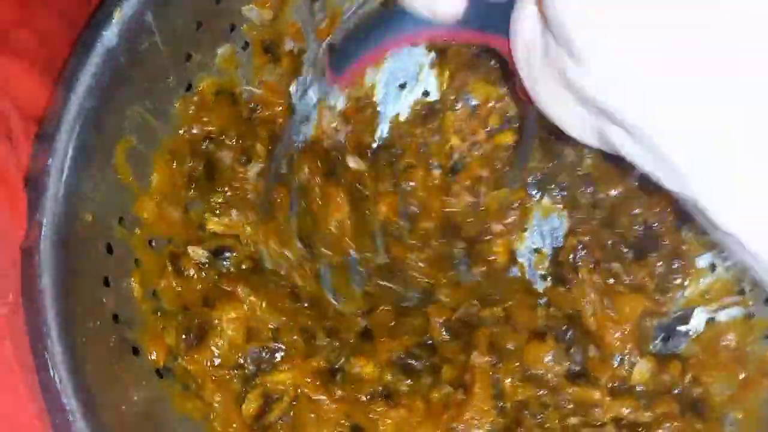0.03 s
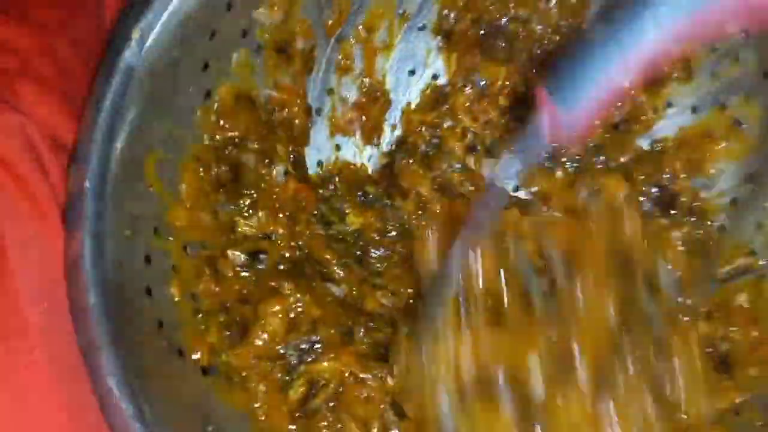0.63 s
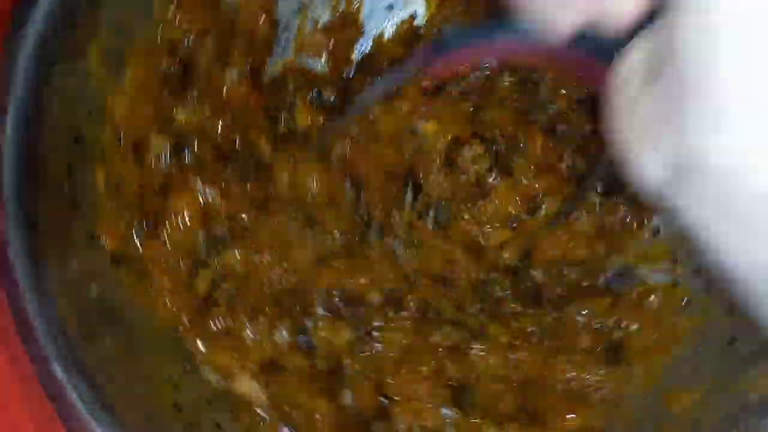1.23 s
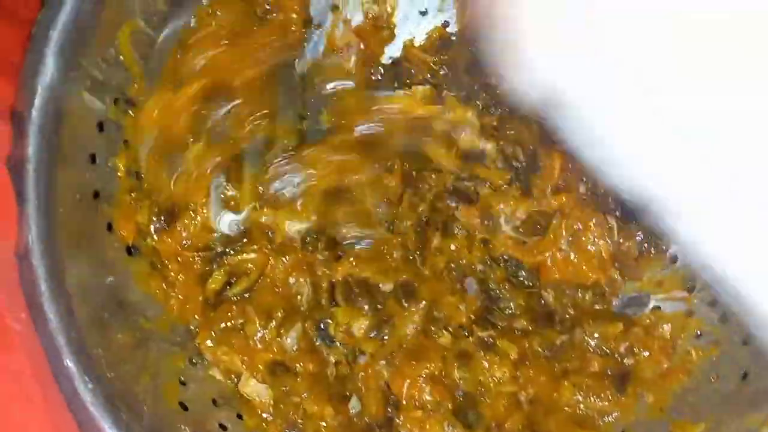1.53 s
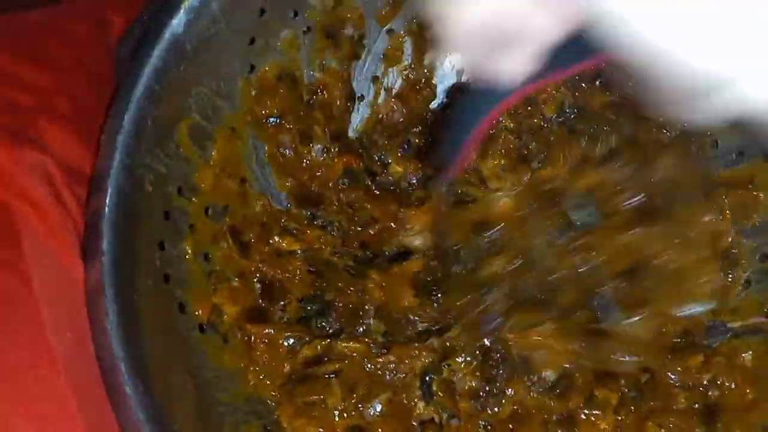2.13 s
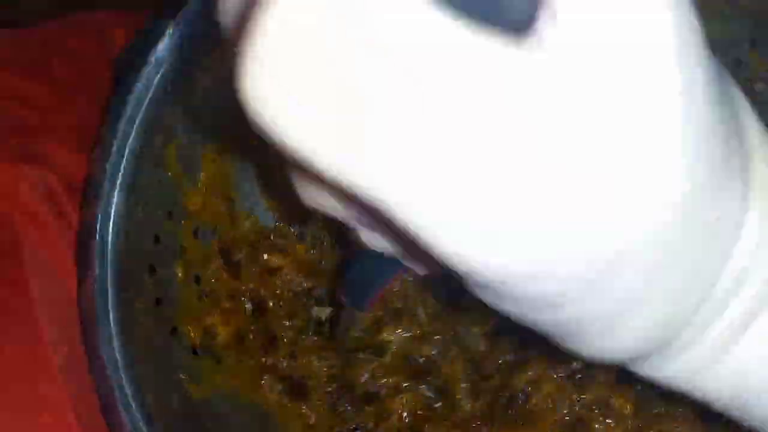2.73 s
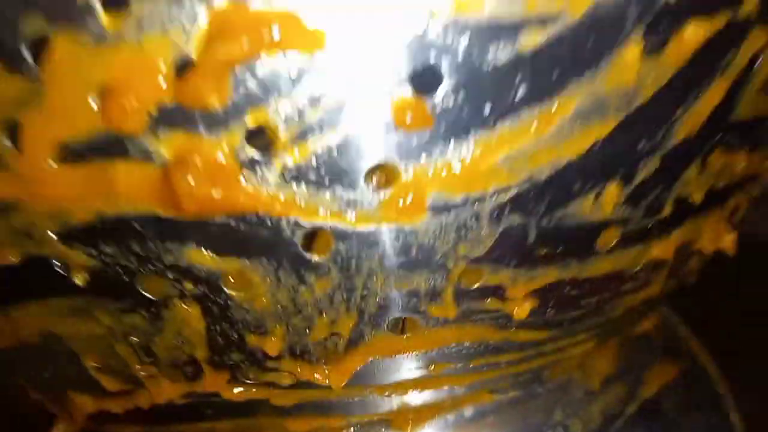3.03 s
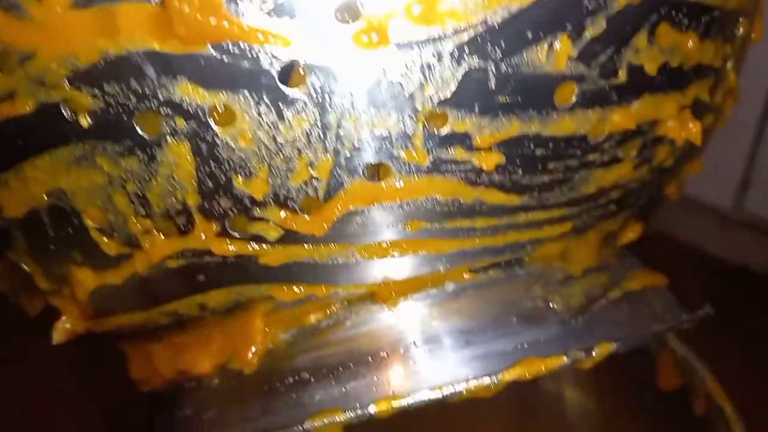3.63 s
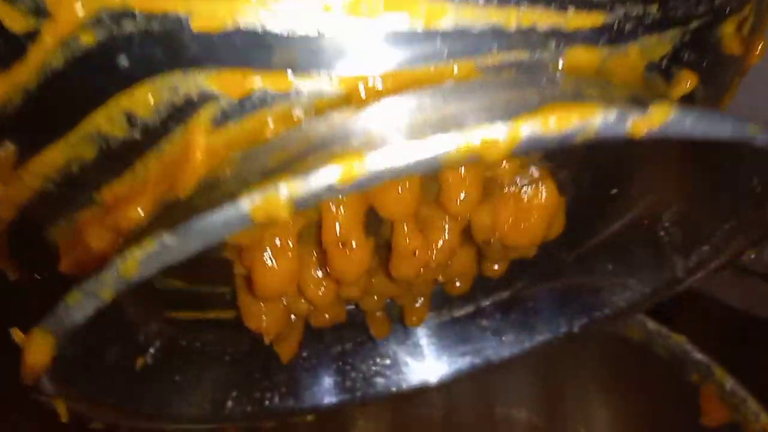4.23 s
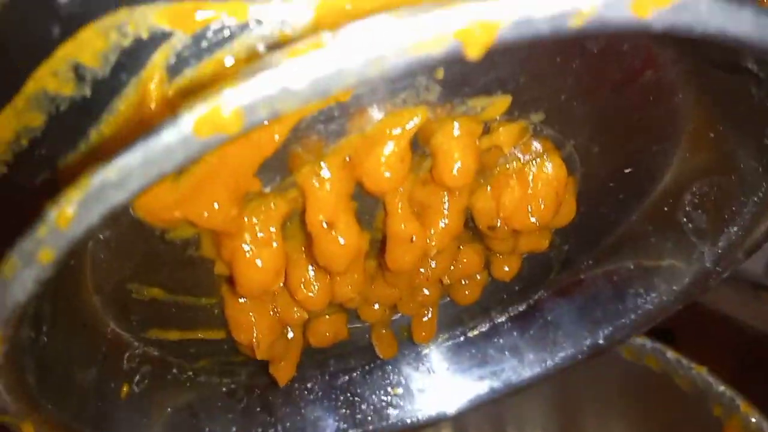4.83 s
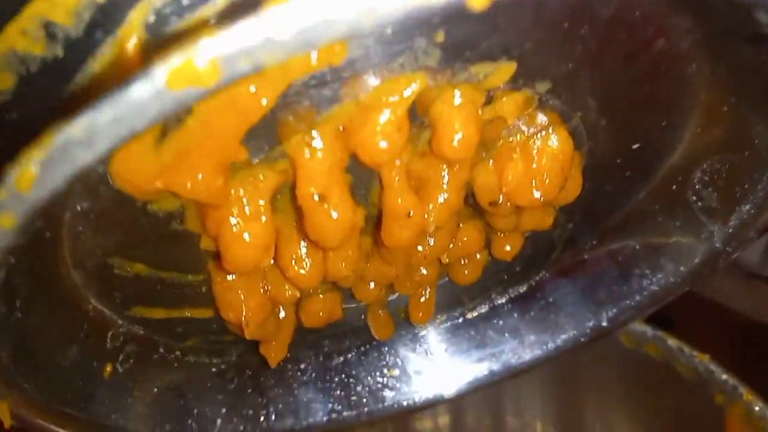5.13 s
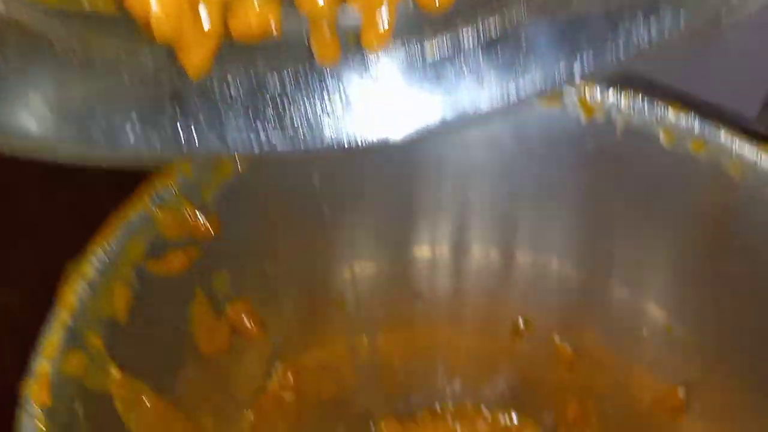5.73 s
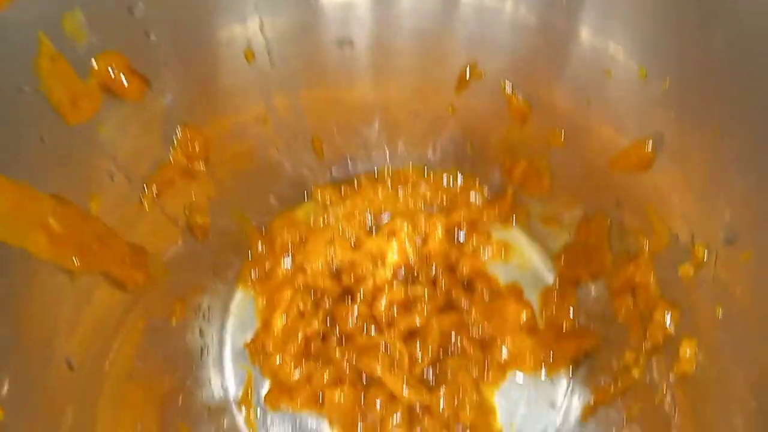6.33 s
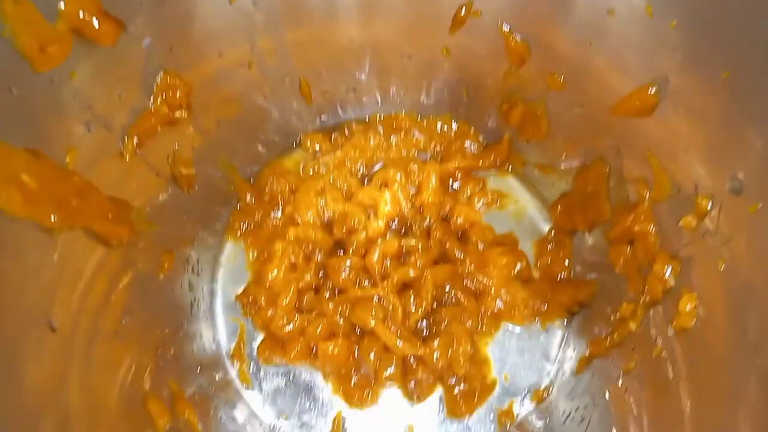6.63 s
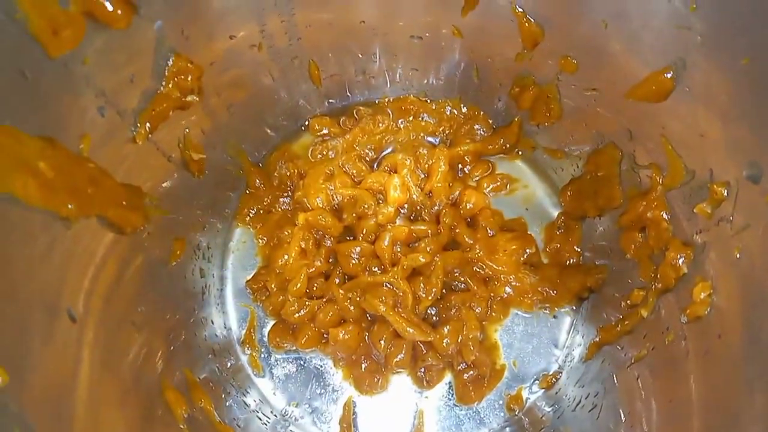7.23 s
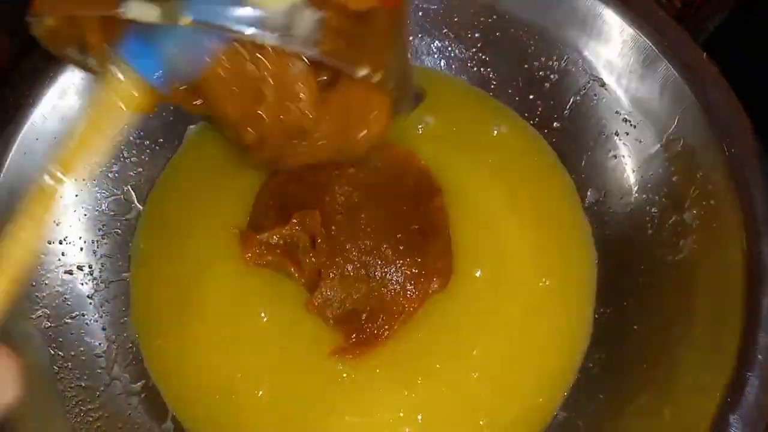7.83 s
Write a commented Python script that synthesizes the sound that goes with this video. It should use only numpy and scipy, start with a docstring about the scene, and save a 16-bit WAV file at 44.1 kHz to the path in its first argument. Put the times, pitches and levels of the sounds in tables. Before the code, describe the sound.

In a quiet kitchen, soft pulp squishes and crackles up close as a utensil drags across a metal colander and now and then knocks it, hardest near the end of the mashing. A dull little click leads into a longer stretch of low rumble and appliance hum. Far off, a clock ticks faintly about once a second and a bird chirps twice. Then everything cuts off.

```python
"""Mashing fruit through a colander

A quiet kitchen, a two-port microphone close to a steel colander. Each push of a hand masher drags over
the perforated metal and squeezes air out of the wet pulp in fizz and pops; now and then it knocks the
colander. Two faint splice clicks lead to the quiet room: an appliance's hum, a far clock, a distant bird.
At 7.3 s everything cuts to silence."""
import sys
import numpy as np
from scipy import signal
from scipy.fft import rfft, irfft
from scipy.io import wavfile

SR = 44100
rng = np.random.default_rng(int(sys.argv[2]) if len(sys.argv) > 2 else 0)


def inscribe(sig):
    """Save sig as 16-bit PCM at rate SR to the path in sys.argv[1].

    A 1-D sig is mono; a 2-D sig holds one channel per row.
    Samples are clipped to [-1, 1] before scaling.
    """
    pcm = np.round(np.clip(np.atleast_2d(sig).T, -1, 1) * 32767)
    wavfile.write(sys.argv[1], SR, pcm.astype(np.int16))


N = 351918
TIME = np.arange(N) / SR
KITCHEN_T60_S, SILENCE_AT_S = 0.34, 7.3

# Low rumble of the kitchen: frequency_hz, density_db_per_hz
RUMBLE_SPECTRUM = [(20, -112), (40, -96.5), (60, -79), (85, -74.5), (120, -76), (170, -86), (230, -78),
                   (290, -77.5), (350, -86.5), (430, -100), (700, -109), (1200, -121), (4000, -140)]
# The appliance as the microphone moves about: time_s, rumble_gain_db, hum_db
APPLIANCE_LEVELS = [(0, 0, -44.5), (1.5, -0.5, -43.5), (2.7, 2, -46.5), (2.85, -4, -47), (5.8, -2.5, -46.5),
                    (6.2, -0.5, -44.5), (7.3, 0, -45)]
# A clock across the room: start_s, relative_db
CLOCK_TICKS = [(3.331, -60), (4.34, -62.5), (5.34, -63), (6.34, -61)]
# A distant bird: start_s, length_s, start_hz, end_hz, level_db
BIRD_CHIRPS = [(4.539, 0.062, 4020, 3300, -71.5), (4.767, .11, 5180, 3650, -65.5)]
# Two faint, dull clicks at a splice, where the sound cuts to the quiet kitchen: start_s, level_db
SPLICE_CLICKS = [(2.772, -40.5), (2.783, -39)]
# Modes of the colander, damped by pulp: pitch_hz, level_db, t60_s (capped in colander_ring)
COLANDER_MODES = [(282, -8, 0.12), (460, -7, 0.099), (626, -3, 0.072), (715, -2.5, 0.058),
                  (792, -12, 0.043), (1155, -14, 0.2), (1560, -19.5, 0.14), (1750, -2, 0.081),
                  (2000, -20, 0.25), (2560, -9.5, 0.18), (2670, -18, 0.28), (2890, -18.5, 0.2),
                  (4180, -12.5, 0.083), (3960, -29.5, 0.15), (4340, -13.5, 0.13), (4200, -26.5, 0.67),
                  (5010, -13.5, 0.17), (5600, -19, 0.13), (5500, -22, 0.21), (5600, -21.5, 0.15),
                  (6170, -15.5, 0.11), (6260, -28, 0.21), (7000, -26, 0.16), (7800, -24, 0.18),
                  (8260, -18.5, 0.062)]
# The colander's crowd of weaker modes: frequency_hz, level_db
SHIMMER_SPECTRUM = [(150, -0.5), (300, 5.5), (720, 5), (980, -6), (1800, 2), (3500, 0.5), (6000, -6.5),
                    (9000, -10), (12000, 0), (16000, 3)]
# Masher meets colander: start_s, ring_db, brightness_hz, thump_db, thump_hz, tick_db
MASHER_KNOCKS = [(-0.012, -34, 1400, -28, 74, -40), (0.758, -39, 1103, -33, 75, -45),
                 (0.863, -41.5, 646, -33, 95, -49), (1.578, -28.5, 1377, -33, 79, -17),
                 (1.834, -32.5, 546, -31.5, 324, -67), (2.4375, -22.5, 10000, -11.5, 78.5, -10),
                 (2.5201, -29.5, 497, -24, 251, -43), (2.524, -39, 450, -35.5, 85.6, -30)]
# Pushes of the masher, with the levels they swell to: start_s, length_s, squelch_db, drag_db
MASHER_PUSHES = [(-.05, 0.043, -40.5, -42.5), (0.097, 0.025, -42, -72), (0.158, 0.11, -49.5, -62.5),
                 (0.303, 0.13, -40, -46), (0.458, 0.12, -44, -49), (0.728, 0.04, -39.5, -47),
                 (0.825, 0.081, -45.5, -49), (1.051, 0.091, -44.5, -54), (1.139, 0.093, -39, -47),
                 (1.549, 0.08, -43.5, -53), (1.668, 0.11, -42, -51), (1.771, 0.088, -41, -47.5),
                 (1.98, 0.13, -46.5, -63.5), (2.548, 0.096, -57.5, -92)]
# Slips of steel through pulp: pitch_hz, relative_db
SLIP_SPECTRUM = [(200, -6), (300, 5), (430, -1), (620, -0.5), (820, -3), (1080, -5.5), (1350, -0.5),
                 (1900, -6), (2450, 3), (3100, -4.5), (4000, 0.5), (5000, -8)]
# Small bubbles in the pulp: pitch_hz, relative_db
BUBBLE_SPECTRUM = [(1800, -13.5), (3200, -6.5), (4400, 1), (6500, -0.5), (9000, -5.5), (12000, 2),
                   (15000, 1.5)]
# The largest air pockets bursting, heard at the near port: start_s, relative_db, nominal_pitch_hz
AIR_POCKETS = [(0.0264, -13, 2300), (0.0525, -11.5, 5540), (.118, -13, 6500), (.125, -11, 4800),
               (0.1315, -11.5, 11900), (0.1876, -19, 13500), (0.2554, -18.5, 13400), (.398, -18, 6500),
               (.5069, -17.5, 5700), (.744, -19.5, 4700), (0.7551, -15, 5730), (.793, -16.5, 14200),
               (0.8738, -18, 6740), (.974, -8.5, 6000), (1.083, -26.5, 15000), (1.1075, -13.5, 7500),
               (1.165, -13.5, 5400), (1.2215, -12.5, 12500), (1.2254, -12, 2720), (1.2291, -7, 7500),
               (1.317, -20, 5970), (1.6945, -21.5, 7400), (1.757, -5.5, 7440), (1.8055, -14, 7400),
               (1.8513, -11.5, 7160), (1.864, -15, 2340), (2.0349, -16, 6800), (2.0668, -11.5, 3300),
               (2.0978, -20, 7526), (2.1235, -26.5, 2195), (2.1608, -24, 15600), (2.1793, -25.5, 6460),
               (2.5908, -25.5, 11600), (2.6324, -28.5, 4700), (2.6634, -24.5, 7000), (2.726, -21, 11900)]
# Resonances of the microphone's ports, left nearer the work: frequency_hz, left_db, right_db
PORT_RESPONSE = [(761, -0.5, 0), (3300, 0.5, -6), (4700, 4.5, 0.5), (5700, 5.5, 5.5), (6500, 6, -3.5),
                 (7400, 9.5, -7.5), (8697, -3, -20), (9660, -10.5, -12.5), (10840, -1.5, 0.5),
                 (12800, 3.5, 2.5), (15300, -5, -7.5)]
# Microphone hiss: frequency_hz, left_db_per_hz, right_db_per_hz
MIC_HISS = [(890, -116, -117), (2370, -118, -113), (3130, -120, -119), (4700, -119, -112),
            (5136, -120, -102), (6000, -119, -102), (6615, -109, -112), (7500, -105, -122),
            (8640, -122, -129), (9400, -128, -127), (11800, -119, -116), (15800, -123, -123)]


def amp(db):
    """Decibels to gain."""
    return 10 ** (np.asarray(db) / 20)


def unit_rms(x):
    """Scale to an rms of one."""
    return x / np.sqrt(np.mean(x ** 2) + 1e-20)


def db_at(spectrum, hz, column=1):
    """Read a spectrum on a log-frequency axis."""
    table = np.array(spectrum)
    return np.interp(np.log(np.maximum(hz, 1)), np.log(table[:, 0]), table[:, column])


def colour(x, spectrum, column=1, size=4096):
    """Causal (minimum-phase) filter with the given spectrum."""
    hz = np.linspace(0, SR / 2, size // 2 + 1)
    cepstrum = irfft(np.log(amp(db_at(spectrum, hz, column))))
    cepstrum[1:size // 2] *= 2
    cepstrum[size // 2 + 1:] = 0
    return signal.oaconvolve(x, irfft(np.exp(rfft(cepstrum))))[:len(x)]


def butter(x, hz, kind, order=2):
    """Butterworth low- or high-pass."""
    return signal.sosfilt(signal.butter(order, hz, kind, fs=SR, output="sos"), x + 1e-18)


def decay(t, t60_s):
    """Exponential fall of 60 dB in t60_s."""
    return np.exp(-np.log(1000) * t / t60_s)


def glide(pitch_hz):
    """A sine that follows a pitch curve."""
    return np.sin(2 * np.pi * np.cumsum(pitch_hz) / SR)


def drift(per_s):
    """A random wander with an rms of one."""
    knots = rng.standard_normal(4096)
    return unit_rms(np.interp(TIME * per_s, np.arange(len(knots)), knots))


def noise(spectrum, column=1):
    """Noise with a spectrum in dB per Hz."""
    return colour(rng.standard_normal(N) * np.sqrt(SR / 2), spectrum, column)


def add(out, start_s, sound):
    """Mix a sound in at a time, trimmed at both ends of the scene."""
    i = round(start_s * SR)
    part = sound[max(0, -i):N - i]
    i = max(0, i)
    out[i:i + len(part)] += part


def reflections(x, t60_s, gap_s):
    """Diffuse reflections of about unit energy, different on each side."""
    t = TIME[:SR // 2]
    tail = rng.standard_normal((2, len(t))) * decay(t, t60_s) * (t > gap_s)
    tail /= np.sqrt(np.sum(tail ** 2) / 2)
    return signal.oaconvolve(x[None], tail, axes=1)[:, :N]


def appliance(hum_hz=119.8):
    """An appliance hums at twice the mains rate over a low rumble."""
    time_s, *levels = np.transpose(APPLIANCE_LEVELS)
    rumble_db, hum_db = (np.interp(TIME, time_s, level) for level in levels)
    mid = noise(RUMBLE_SPECTRUM)
    side = amp(-9) * noise(RUMBLE_SPECTRUM) * [[1], [-1]]
    rumble = amp(rumble_db) * (mid + side)
    hum = amp(hum_db + drift(4.6)) * np.sin(2 * np.pi * hum_hz * TIME + 0.063 * drift(12))
    return rumble * amp([[-0.5], [0.5]]) + hum * amp([[-1.5], [2.3]])


def bird():
    """Each distant chirp is a falling whistle that swells and fades."""
    out = np.zeros(N)
    for start_s, length_s, start_hz, end_hz, level_db in BIRD_CHIRPS:
        progress = np.linspace(0, 1, int(length_s * SR))
        whistle = glide(start_hz + (end_hz - start_hz) * progress)
        add(out, start_s, amp(level_db) * np.sin(np.pi * progress) * whistle)
    return out


def clock(tick_hz=4100):
    """Each tick is a short burst of noise coloured by the clock's case."""
    out, t = np.zeros(N), TIME[:SR // 8]
    case = [(tick_hz / 2, -25), (tick_hz * 0.86, -7), (tick_hz, 2), (tick_hz * 1.11, -7), (15000, -10)]
    for start_s, level_db in CLOCK_TICKS:
        tick = colour(rng.standard_normal(len(t)), case) * decay(t, 0.087)
        add(out, start_s, amp(level_db + 6.5) * tick)
    return out


def splice_clicks():
    """Two faint, dull clicks at a splice: each a step in the signal that dies away quickly."""
    out = np.zeros(N)
    for start_s, level_db in SPLICE_CLICKS:
        add(out, start_s, amp(level_db) * decay(TIME[:SR // 50], 0.0097))
    return out


def colander_ring(longest_t60_s=0.32):
    """The steel rings after one touch; every touch weights the modes anew."""
    modes, t = 0, TIME[:SR * 2 // 3]
    for hz, level_db, t60_s in COLANDER_MODES:
        weight = amp(level_db + rng.normal(0, 2.6)) * rng.choice([-1, 1])
        modes += weight * np.sin(2 * np.pi * hz * t) * decay(t, min(t60_s, longest_t60_s))
    weak_modes = colour(rng.standard_normal(len(t)), SHIMMER_SPECTRUM)
    shimmer, clatter = decay(t, 0.42), amp(6) * decay(t, 0.1)
    return modes + amp(-7) * weak_modes * (shimmer + clatter)


def knocks(tick_hz=6030, overtone_hz=12400, stiffening=0.9):
    """A bare metal tick, the bowl's ring and its slower bounce on the pot; gives near and far wall."""
    near_wall, far_wall, t = np.zeros(N), np.zeros(N), TIME[:SR * 2 // 3]
    tick = np.sin(2 * np.pi * tick_hz * t) * decay(t, 0.0091)
    tick += amp(4) * np.sin(2 * np.pi * overtone_hz * t) * decay(t, 0.002)
    for start_s, ring_db, brightness_hz, thump_db, thump_hz, tick_db in MASHER_KNOCKS:
        swell = t * thump_hz / 1.45   # reaches one at the thump's peak
        bounce_hz = thump_hz * (1 + stiffening * np.exp(-2 * swell))   # quicker while contact is tight
        thump = glide(bounce_hz) * (swell * np.exp(1 - swell)) ** 3
        near_ring, far_ring = (butter(colander_ring(), brightness_hz, "low", order=4) for _ in range(2))
        add(near_wall, start_s, amp(ring_db) * near_ring + amp(thump_db) * thump + amp(tick_db) * tick)
        add(far_wall, start_s, amp(ring_db - 8.5) * far_ring)
    return near_wall, far_wall


def push_levels(attack_s=0.045, squelch_db_per_s=34, drag_db_per_s=53):
    """Squelch and drag in dB: the masher sinks in, pressure builds, then it lets go."""
    wet = metal = amp(-110)
    for start_s, length_s, squelch_db, drag_db in MASHER_PUSHES:
        contact = np.sin(np.pi / 2 * np.clip((TIME - start_s) / attack_s, 0, 1)) ** 2
        left_s = np.maximum(start_s + length_s - TIME, 0)
        since_s = np.maximum(TIME - start_s - length_s, 0)
        settling = amp(-13.5) * decay(since_s, 0.98)   # the pulp crackles on after the push
        release = np.hypot(decay(since_s, 0.21), settling)
        wet = np.hypot(wet, contact * amp(squelch_db - squelch_db_per_s * left_s) * release)
        metal = np.hypot(metal, contact * amp(drag_db - drag_db_per_s * left_s) * decay(since_s, 0.19))
    return 20 * np.log10(wet), 20 * np.log10(metal)


def cavities(spectrum, per_s, spread_db, cycles, patchy_db, shifts_per_s, pitches=24):
    """Random clicks ring small cavities briefly; as the pulp deforms, other pitches take the lead."""
    sizes = amp(spread_db * np.minimum(rng.exponential(1, N), 4)) * rng.choice([-1, 1], N)
    clicks = sizes * (rng.random(N) < per_s / SR)
    cavity_hit = rng.integers(0, pitches, N)
    out = np.zeros(N)
    for k, hz in enumerate(np.geomspace(spectrum[0][0], spectrum[-1][0], pitches)):
        strikes = clicks * (cavity_hit == k) * amp(db_at(spectrum, hz) + patchy_db * drift(shifts_per_s))
        radius, angle = decay(1 / SR, cycles / hz), 2 * np.pi * hz / SR
        resonator = [np.sin(angle), -np.sin(angle)], [1, -2 * radius * np.cos(angle), radius ** 2]
        out += signal.lfilter(*resonator, strikes + 1e-18) / np.sqrt(angle)
    return unit_rms(out)


def drag(level_db):
    """The masher slips over holes and seeds, ringing hollows in the pulp and the colander's modes."""
    slips = cavities(SLIP_SPECTRUM, per_s=6000, spread_db=2, cycles=24, patchy_db=4.5, shifts_per_s=25)
    slips *= amp(level_db)
    ring = colander_ring()
    steel = signal.oaconvolve(slips, ring / np.linalg.norm(ring))[:N]
    return amp(7) * slips + amp(-14) * steel


def pops(t60_s=0.0033, rise=0.37, snap_db=-11):
    """A film tears with a snap; the opening air pocket rings and sweeps up in pitch."""
    out, t = np.zeros(N), TIME[:SR // 30]
    envelope = decay(t, t60_s) * (1 - np.exp(-t / 0.000053))
    for start_s, level_db, hz in AIR_POCKETS:
        pitch_hz = hz * (1 + rise * (0.42 - np.exp(-6 * t / t60_s)))
        tone = glide(pitch_hz) * amp(3 - db_at(PORT_RESPONSE, hz))   # offsets the near port's resonance
        snap = amp(snap_db) * butter(rng.standard_normal(len(t)), hz / 2, "high")
        add(out, start_s, amp(level_db) * (tone + snap) * envelope)
    return butter(out, 2400, "high", order=1)


def squelch(level_db, stickiness=0.55):
    """Hard pressure gives a dense fizz; as it eases, the pulp peels off in separate sticky clicks."""
    slack_db = stickiness * np.clip(-43.5 - level_db, -8, 10)
    fizz = cavities(BUBBLE_SPECTRUM, per_s=10000, spread_db=2.5, cycles=17, patchy_db=4, shifts_per_s=45)
    crackle = cavities(BUBBLE_SPECTRUM, per_s=150, spread_db=3, cycles=13, patchy_db=5, shifts_per_s=96)
    return amp(level_db + 1.5 - slack_db / 2) * fizz + amp(level_db - 1.5 + slack_db) * crackle


def close_left(x, shadow_db=-11, lag_s=0.00053, split_hz=800):
    """The bass reaches both ports alike; the treble reaches the right one later and shaded."""
    bass, treble = (butter(butter(x, split_hz, kind), split_hz, kind) for kind in ("low", "high"))
    shaded = amp(shadow_db) * np.interp(TIME - lag_s, TIME, treble)
    return np.array([bass + treble, bass + shaded])


def scene():
    """Pulp and metal close to the microphone, reflected in the bowl, with the kitchen behind."""
    squelch_db, drag_db = push_levels()
    near_wall, far_wall = knocks()
    foreground = squelch(squelch_db) + drag(drag_db) + pops() + near_wall + splice_clicks()
    # the far wall of the bowl and the pulp on it face the right port
    far_pulp = amp(-8) * (squelch(squelch_db) + drag(drag_db))
    far_side = butter(far_pulp + far_wall, 650, "high") * [[0], [1]]
    above_bass = butter(foreground, 280, "high")
    bowl = amp([[-8.5], [-10.5]]) * reflections(above_bass, t60_s=0.0089, gap_s=0.00053)
    kitchen = amp(-19) * reflections(above_bass, KITCHEN_T60_S, gap_s=0.006)
    distant = reflections(clock() + bird(), KITCHEN_T60_S, gap_s=0.0018)   # no direct path
    return close_left(foreground) + far_side + bowl + kitchen + distant + appliance()


def record(dry):
    """Each microphone port adds its resonances and hiss; the sound cuts off and the top is filtered."""
    ports = np.array([colour(side, PORT_RESPONSE, column) + noise(MIC_HISS, column)
                      for column, side in enumerate(dry, start=1)])
    low_pass = signal.ellip(10, 0.1, 80, 16100, fs=SR, output="sos")   # steep edge at 16.1 kHz
    return signal.sosfilt(low_pass, ports * (TIME < SILENCE_AT_S) + 1e-18)


dry = scene()
out = record(dry)
inscribe(out)
```